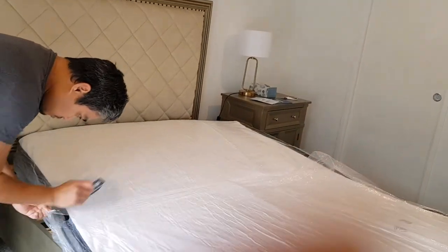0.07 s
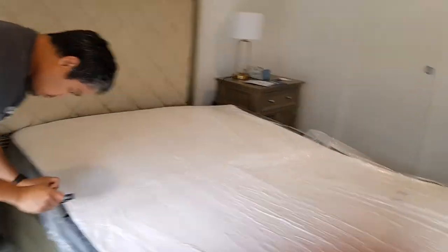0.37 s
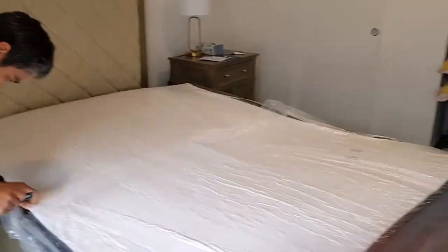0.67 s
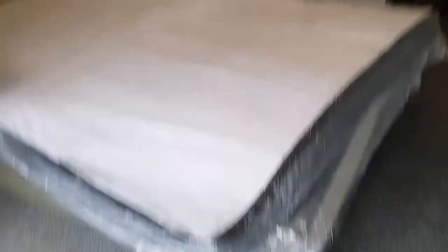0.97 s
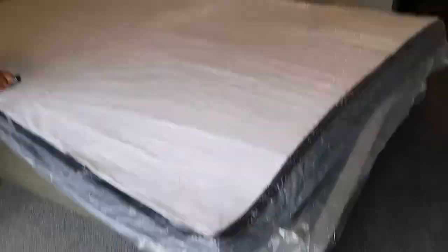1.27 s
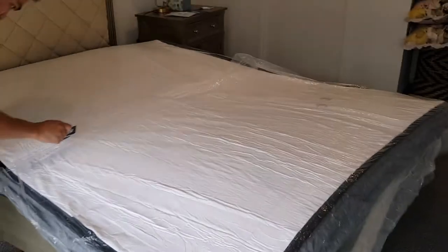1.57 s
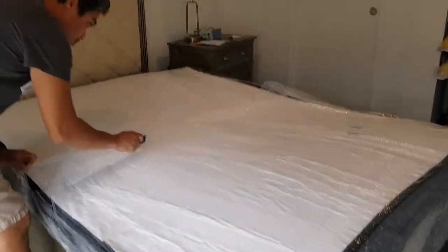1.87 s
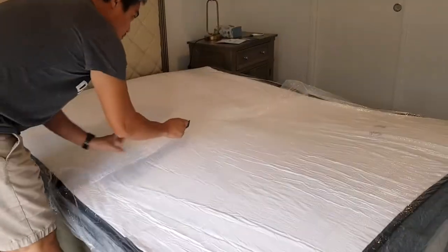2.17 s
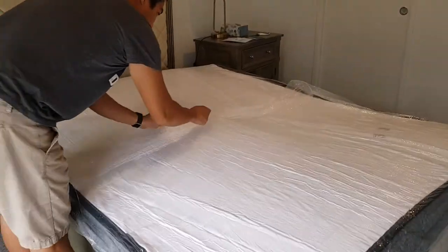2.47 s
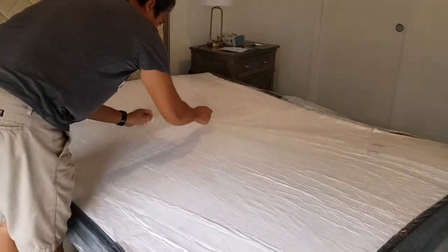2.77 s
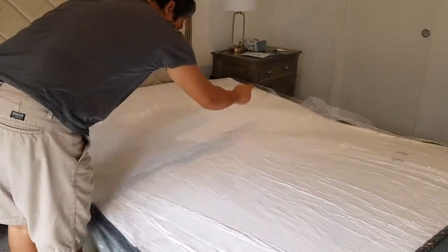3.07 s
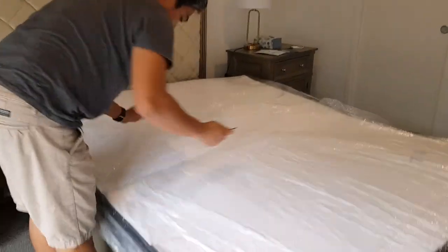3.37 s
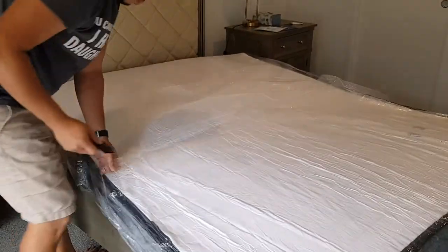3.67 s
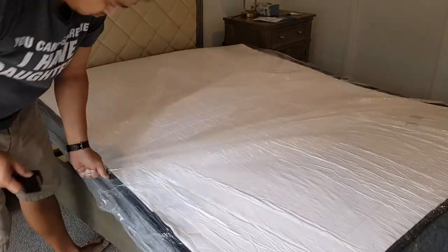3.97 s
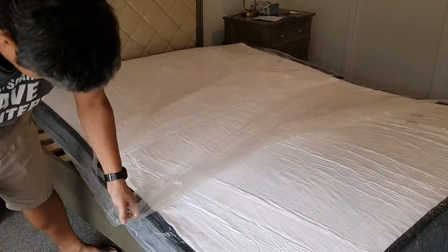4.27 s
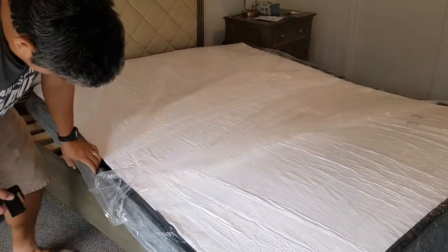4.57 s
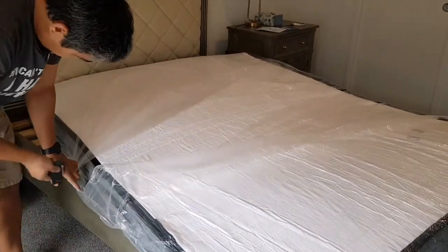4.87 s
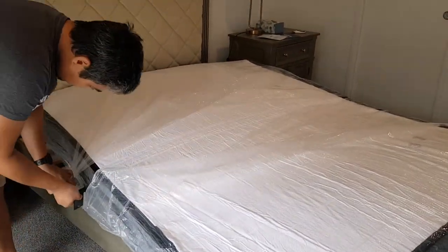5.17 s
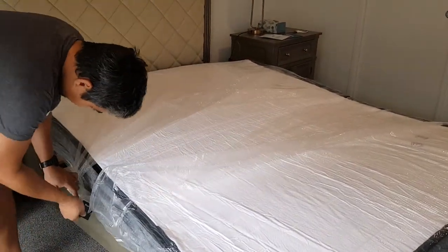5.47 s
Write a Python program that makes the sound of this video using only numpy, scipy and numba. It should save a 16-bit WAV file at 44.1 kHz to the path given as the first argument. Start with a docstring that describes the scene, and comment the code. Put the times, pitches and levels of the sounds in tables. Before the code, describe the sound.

Plastic wrap slides off a mattress in a quiet bedroom, rustling and crackling, with soft bumps and a few knocks on the microphone.

```python
"""In a small carpeted bedroom, plastic film is slit and dragged off a mattress, a metre or two from a
hand-held phone. The sliding film hisses and crinkles as it rubs and its wrinkles buckle, and the mattress
rumbles under it. Hands bump the padding, single creases snap, and near the end the taut film slaps twice.
Fingers knock on the phone and brush over its left microphone hole."""
import sys
import numpy as np
from scipy import signal
from scipy.fft import rfft, irfft
from scipy.io import wavfile
from scipy.ndimage import uniform_filter1d
from numba import njit

SR = 44100
rng = np.random.default_rng(int(sys.argv[2]) if len(sys.argv) > 2 else 0)


def waveform_to_disk(signal):
    """Save audio, clipped to [-1, 1], as 16-bit WAV at the path in sys.argv[1]."""
    frames = np.transpose(np.atleast_2d(signal))
    scaled = np.clip(frames, -1, 1) * 32767
    samples = np.round(scaled).astype(np.int16)
    wavfile.write(sys.argv[1], SR, samples)


N = 251811
T = np.arange(N) / SR

# Tone curves: how much bass and treble each sound has. Each row: frequency in Hz, relative level in dB.
ROOM_TONE = [(20, -2), (80, 4), (160, 7), (450, -6), (1000, 4.5), (4000, -10), (16000, -5)]
FIRM_TOUCH_TONE = [(40, -1), (110, 0), (250, -2), (700, -1), (1900, -2), (3500, -4), (6000, -7),
                   (10000, -3.5), (16000, 1)]
LIGHT_TOUCH_TONE = [(4000, -6), (9000, -0.5), (14500, 3)]
COVER_TONE = [(150, -23.5), (195, -2), (320, -1.5), (430, -3), (550, -3.5), (720, -6.5), (1200, -6)]
FLUTTER_TONE = [(20, -25), (45, -14), (66, -4), (90, -3), (120, -8.5), (160, -13), (300, -18)]
SLAP_TONE = [(50, -21), (110, 5), (155, -4), (210, 1.5), (350, -5), (750, -7), (1100, -3.5), (1400, -0.5),
             (2200, -0.5), (3500, -3.5), (7000, -7.5), (11500, -10.5), (16000, -10)]
HISS_TONE = [(500, -32), (750, -10.5), (1050, -1.5), (1500, -3), (2200, -0.5), (3200, -0.5), (5000, -2),
             (7500, -5), (10000, -10), (16000, -44)]
SHEEN_TONE = [(5000, -21), (7500, -6), (10300, -4), (12000, -8), (13500, -6), (16000, -11.5)]  # sheen is the film's highest treble

# Levels below compare the rows of one table. A decay is the time to fall to about a third.
# Knocks on the phone. Each row: start in seconds, level in dB, click pitch in Hz, click decay in seconds,
# thump compared with the click in dB, left minus right in dB.
PHONE_KNOCKS = [(.5668, -40.5, 1250, .0015, -24, -3), (.9576, -45.5, 1100, .0012, -10, 2),
                (.9755, -46, 1400, .0012, -6, 4), (1.25, -38, 1400, .002, -14, 2),
                (1.8263, -51, 700, .003, -19, -1)]
# A finger on the left hole. Each row: start and let-go in seconds, level in dB, whistle pitch in Hz.
FINGER_TOUCHES = [(1.138, 1.182, -38.5, 14400), (1.202, 1.231, -40.5, 13600), (1.236, 1.29, -39.5, 13200),
                  (1.307, 1.537, -47, 14400), (1.55, 1.714, -51.5, 14500)]
# Hands on the mattress. Each row: start in seconds, level in dB, pitch in Hz.
HAND_BUMPS = [(.0, -51, 197), (0.01, -56, 101), (2.04, -63.5, 182), (3.106, -53, 93), (3.214, -48.5, 70.6),
              (3.736, -69, 191), (4.127, -53.5, 108), (4.603, -62.5, 215), (5.231, -65.5, 192),
              (5.422, -63.5, 183)]
# Creases snapping. Each row: start in seconds, level in dB, extra sheen in dB, decay in seconds.
CREASE_SNAPS = [(.135, -57, 6, .0027), (.501, -58.5, 8.5, 0.0017), (.549, -54, -6, .002),
                (.896, -55, 7, 0.0016), (1.9168, -52, 5.5, 0.0025), (2.569, -47.5, -14, .003),
                (2.6274, -50, -4, 0.0081), (2.746, -48, -8, .0036), (2.827, -50, -7, .004),
                (3.5764, -49.5, 1, 0.0048), (3.6526, -51, 0, .005), (3.675, -52, -4, 0.0055),
                (5.055, -58.5, 8, .0029), (5.111, -49.5, 2, 0.0059), (5.273, -44, -5.5, .0052),
                (5.283, -47, 2, .003), (5.399, -51, -3, .003), (5.4257, -37.5, -3, .0028),
                (5.514, -59, -11, .0022)]
# The hits that make up the slaps. Each row: start in seconds, level in dB, decay in seconds.
SLAP_HITS = [(5.5305, -31.5, 0.0057), (5.55, -38, 0.0067), (5.559, -31.5, 0.0052), (5.578, -47, 0.027)]
# Tones that ring after a hit. Each row: pitch in Hz, level in dB, seconds to fade by 60 dB.
BED_TONES = [(193, -16, 0.2), (365, -5.5, 0.18), (536, -5, 0.21), (1356, 1.5, 0.11), (1800, -6, 0.27),
             (1920, 4.5, 0.13)]
# Pulls on the film. Each row: start and let-go in seconds, level in dB, then sheen, cover rub and
# flutter, each in dB added to that level.
FILM_PULLS = [(-.04, 0.001, -44, -0.5, -6.5, -11), (0.096, 0.208, -61.5, -4.5, -38, -37),
              (0.237, 0.322, -57.5, -1.5, -22.5, -31), (0.439, 0.585, -64.5, 0, -28, -22.5),
              (0.586, 0.654, -56, 0.5, -17.5, -19), (0.706, 0.777, -53, 1.5, -19, -19),
              (0.753, 0.785, -54, -7, -6.5, -11), (0.827, 0.947, -68.5, 1, -4.5, -7),
              (0.983, 1.01, -65, -2, -7, -10), (1.052, 1.12, -64.5, 0, -24, -24),
              (1.12, 1.256, -65.5, -8, -6, -12), (1.237, 1.294, -53, -3, -11, -15),
              (1.32, 1.477, -58, -1, -17.5, -18), (1.473, 1.566, -57, 1, -12.5, -15.5),
              (1.58, 1.756, -61, 0.5, -12.5, -15.5), (1.795, 1.905, -66, 1.5, -9, -10),
              (1.924, 2.008, -60.5, 3.5, -12, -15), (2.009, 2.107, -62, 1.5, -6, -10),
              (2.177, 2.22, -73.5, -11, -11, 0), (2.293, 2.404, -63, -4, -20, -13),
              (2.376, 2.541, -56.5, -1.5, -16.5, -18), (2.56, 2.755, -61, -3, -13.5, -16),
              (2.797, 3.056, -53.5, -1.5, -14.5, -21), (3.01, 3.108, -43, 0.5, -10, -13.5),
              (3.11, 3.194, -52.5, -2, -12, -9), (3.187, 3.224, -43, -1, -11, -12.5),
              (3.517, 3.599, -61.5, -2.5, -9.5, -12.5), (3.641, 3.74, -52.5, -1.5, -20.5, -22),
              (3.71, 3.945, -46, -1, -12, -18.5), (3.952, 4.14, -43.5, 1, -10, -13),
              (4.148, 4.371, -50.5, -0.5, -11.5, -16), (4.536, 4.623, -58, 3, -19, -19),
              (4.602, 4.723, -47.5, 0, -13, -19.5), (4.736, 4.788, -50, -0.5, -11, -16.5),
              (4.821, 5.052, -56.5, -4, -10.5, -20), (5.224, 5.319, -62, -4, -8, -5),
              (5.394, 5.484, -56, -5, -14.5, -27), (5.61, 5.69, -64, -4, -8, -18)]


def undb(db):
    """Turn decibels into a gain to multiply by."""
    return 10 ** (np.asarray(db) / 20)


def unit(x):
    """Scale a signal to an average power of 1."""
    return x / np.sqrt(np.mean(x ** 2))


def pan(db):
    """Left and right gains, with the left louder by db."""
    return undb(np.array([[db], [-db]]) / 2)


def colour(x, points, size=4096):
    """Filter a sound through a tone curve; white noise keeps its power."""
    hz, db = np.transpose(points)
    octave = np.log2(np.maximum(np.fft.rfftfreq(size, 1 / SR), 1))
    outside = np.abs(octave - np.clip(octave, np.log2(hz[0]), np.log2(hz[-1])))
    gain_db = np.maximum(np.interp(octave, np.log2(hz), db) - 18 * outside, -80)
    # fold the filter so that it never rings before a sound arrives
    cepstrum = irfft(np.log(undb(gain_db)))
    cepstrum[1:size // 2] *= 2
    cepstrum[size // 2 + 1:] = 0
    response = irfft(np.exp(rfft(cepstrum)))
    return np.apply_along_axis(signal.fftconvolve, -1, x, response / np.linalg.norm(response))[..., :N]


def wander(rate):
    """Glide to a new random value rate times a second."""
    hold = int(SR / rate)
    steps = np.repeat(rng.standard_normal(N)[:N // hold + 1], hold)
    return unit(uniform_filter1d(steps, hold)[:N])


def crackle(rate, spread_db):
    """Tiny clicks of uneven size at random moments, about rate a second."""
    size = undb(spread_db * np.minimum(rng.exponential(size=N), 5))
    return unit((rng.random(N) < rate / SR) * size * rng.choice([-1, 1], N))


def fade(start, decay_s):
    """A gain that jumps up at start, then dies away."""
    return (T >= start) * np.exp(-np.clip((T - start) / decay_s, 0, 40))


def stroke(start, end, attack_s, release_db_per_s):
    """Gain of one hand movement: it rises, holds until let go, then dies away."""
    return np.clip((T - start) / attack_s, 0, 1) * undb(-release_db_per_s * np.maximum(T - end, 0))


@njit
def resonate(x, hz, width_hz):
    """Let through only a band around a moving pitch."""
    out, band_state, low_state = np.empty(len(x)), 0., 0.
    for i in range(len(x)):
        tuning, damping = np.tan(np.pi * hz[i] / SR), width_hz / hz[i]
        band = (band_state + tuning * (x[i] - low_state)) / (1 + tuning * (tuning + damping))
        band_state = 2 * band - band_state
        low_state += 2 * tuning * band
        out[i] = damping * band
    return out


def bedroom(x, echo_db, left_db, echo_s=0.081, right_lag_samples=4):
    """The direct sound plus a short, noisy echo scattered by the room."""
    t = T[:SR // 2]
    decay = undb(-60 * t / echo_s) ** 2 * (t > .002)
    energy = np.abs(signal.fftconvolve(x ** 2, decay / decay.sum())[:N])
    mid, side = rng.standard_normal((2, N)) * np.sqrt(energy / 2)
    # long waves reach both microphones more alike
    side = side - 0.51 * signal.sosfilt(signal.butter(1, 600, fs=SR, output="sos"), side)
    direct = pan(left_db) * np.array([x, np.pad(x, (right_lag_samples, 0))[:N]])
    echo = undb(echo_db) * np.array([mid + side, mid - side])
    return (direct + echo) / np.sqrt(1 + undb(echo_db) ** 2)


def quiet_room():
    """The faint, steady noise of the room."""
    return undb(-70.5) * colour(rng.standard_normal((2, N)), ROOM_TONE)


def phone_knocks(thump_hz=100, thump_s=0.014):
    """Each knock gives a dead, gritty click from two tones of the case, and a low thump."""
    out = 0
    for start, db, hz, click_s, thump_db, left_db in PHONE_KNOCKS:
        turn = 2 * np.pi * (T - start)
        case = np.sin(hz * turn) + undb(-3) * np.sin(2.15 * hz * turn)
        click = fade(start, click_s) * (case + undb(-1) * rng.standard_normal(N))
        thump = undb(thump_db) * fade(start, thump_s) * np.sin(thump_hz * turn)
        out = out + undb(db) * pan(left_db) * (click + thump)
    return out


def finger_brush(whistle_width_hz=1300, right_db=-22):
    """Skin slides over the left microphone; the half-covered hole whistles high up."""
    touches = [undb(db) * stroke(start, end, attack_s=0.023, release_db_per_s=400) + 1e-9
               for start, end, db, _ in FINGER_TOUCHES]
    pressure = sum(touches)
    whistle_hz = sum(touch * hz for touch, (*_, hz) in zip(touches, FINGER_TOUCHES)) / pressure
    rub = unit(crackle(9000, spread_db=4) + rng.standard_normal(N))
    # a light touch only hisses; a firm one whistles and rumbles too
    firm = (pressure / pressure.max()) ** 0.86
    whistle = undb(-3) * firm ** 2 * unit(resonate(rub, whistle_hz, whistle_width_hz))
    skin = firm * colour(rub, FIRM_TOUCH_TONE)
    hiss = undb(-5.5) * colour(rng.standard_normal(N), LIGHT_TOUCH_TONE)
    return (whistle + skin + hiss) * pressure * np.array([[1], [undb(right_db)]])


def hand_bumps(push_s=0.0047, decay_s=0.013):
    """A hand pushes softly into the padding, which swings a few times."""
    out = 0
    for start, db, hz in HAND_BUMPS:
        swell = fade(start, decay_s) - fade(start, push_s)
        out = out + undb(db) * swell * np.sin(2 * np.pi * hz * (T - start))
    return undb(13.5) * out


def pull_gains(attack_s=0.039, resting_db=-74, settle_db=-14.5, flutter_lag_s=0.0085):
    """How strongly the pulls drive hiss, sheen, cover rub and flutter; overlapping pulls add in power."""
    hiss = sheen = undb(resting_db) ** 2  # the film never quite rests
    cover = flutter = 0
    for start, end, db, sheen_db, cover_db, flutter_db in FILM_PULLS:
        pull = undb(db) * stroke(start, end, attack_s, release_db_per_s=172)
        # the stretched film settles more slowly than the pull
        settle = undb(db + settle_db) * stroke(start, end, attack_s, release_db_per_s=76)
        slide = np.hypot(pull, settle)
        hiss = hiss + slide ** 2
        sheen = sheen + (slide * undb(sheen_db)) ** 2
        cover = cover + (pull * undb(cover_db)) ** 2
        flutter = flutter + (pull * undb(flutter_db)) ** 2
    late_flutter = np.interp(T - flutter_lag_s, T, flutter)
    return np.sqrt([hiss, sheen, cover, late_flutter])


def mattress_rumble(cover_gain, flutter_gain):
    """The padded cover is rubbed and the loose sheet flaps as the film drags."""
    drag = bedroom(rng.standard_normal(N), echo_db=3, left_db=-1)
    cover = undb(4.5) * colour(drag * cover_gain, COVER_TONE)
    flutter = undb(1) * colour(drag * flutter_gain, FLUTTER_TONE)
    return cover + flutter


def crease_snaps():
    """A crease flips over in a quick run of tiny buckles."""
    buckles = crackle(15000, spread_db=-2.5)
    body_gain = sum(undb(db) * fade(start, decay) for start, db, _, decay in CREASE_SNAPS)
    sheen_gain = sum(undb(db + extra) * fade(start, decay) for start, db, extra, decay in CREASE_SNAPS)
    body, sheen = (bedroom(buckles * gain, echo_db=-5, left_db=2.5) for gain in (body_gain, sheen_gain))
    return undb(1.5) * (colour(body, HISS_TONE) + colour(sheen, SHEEN_TONE))


def film_slaps():
    """The taut film cracks against the bed, which rings briefly."""
    hits = sum(undb(db) * fade(start, decay) for start, db, decay in SLAP_HITS)
    crack = bedroom(rng.standard_normal(N) * hits, echo_db=-1, left_db=1.5)
    ring = 0
    for start, db, _ in SLAP_HITS:
        for hz, tone_db, ring_s in BED_TONES:
            pitch = hz * (1 + 0.0052 * rng.standard_normal())
            # each microphone catches the wave at a different point in its swing
            phase = 2 * np.pi * (pitch * (T - start) + rng.random((2, 1)))
            ring = ring + undb(db + tone_db) * fade(start, ring_s / np.log(1000)) * np.sin(phase)
    return undb(5) * colour(crack, SLAP_TONE) + undb(-13) * ring


def sliding_film(speed, sheen_gain, smooth_db=-2, grip_db=1.5, peak_buckles_per_s=5000):
    """Smooth rubbing plus buckling wrinkles, more of them the faster the film is pulled."""
    rate = peak_buckles_per_s * np.sqrt(speed / speed.max())
    wrinkles = unit(crackle(rate, spread_db=3) / np.sqrt(rate))
    friction = unit(wrinkles + undb(smooth_db) * rng.standard_normal(N))
    grip = undb(grip_db * wander(70))  # the film catches and lets go
    rub = bedroom(friction * speed * grip, echo_db=6.5, left_db=3)
    # now and then a near wrinkle ticks out of the hiss
    rub = rub + undb(-12) * pan(2) * crackle(130, spread_db=3) * speed
    hiss = undb(1.97) * colour(rub, HISS_TONE)
    sheen = undb(0.5) * colour(rub * sheen_gain / speed, SHEEN_TONE)
    return hiss + sheen


def scene():
    """Add up the room, the fingers on the phone, the mattress and the film."""
    speed, sheen_gain, cover_gain, flutter_gain = pull_gains()
    film = sliding_film(speed, sheen_gain)
    mattress = mattress_rumble(cover_gain, flutter_gain) + hand_bumps()
    return quiet_room() + phone_knocks() + finger_brush() + mattress + crease_snaps() + film_slaps() + film


def record(dry, top_hz=15950):
    """The phone cuts off the very highest treble."""
    return signal.sosfilt(signal.ellip(10, .2, 70, top_hz, fs=SR, output="sos"), dry)


dry = scene()
out = record(dry)
waveform_to_disk(out)
```